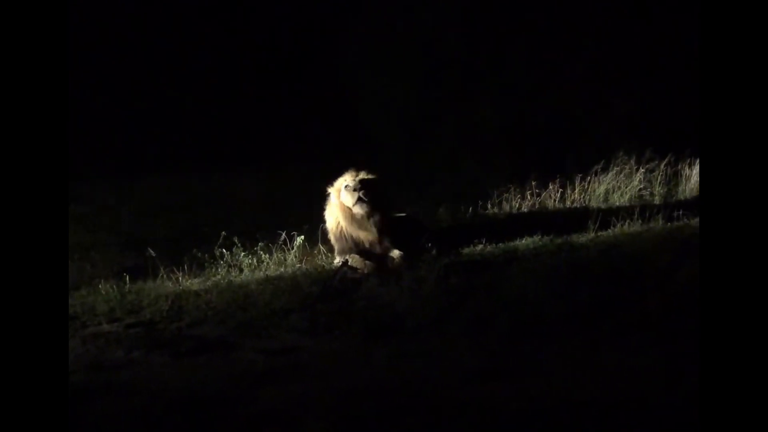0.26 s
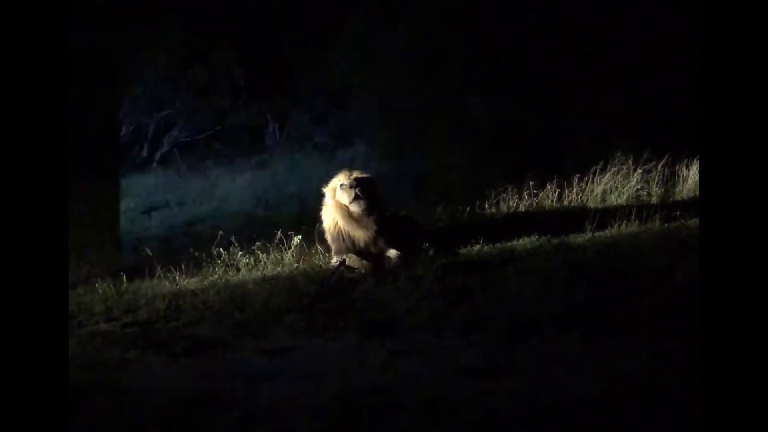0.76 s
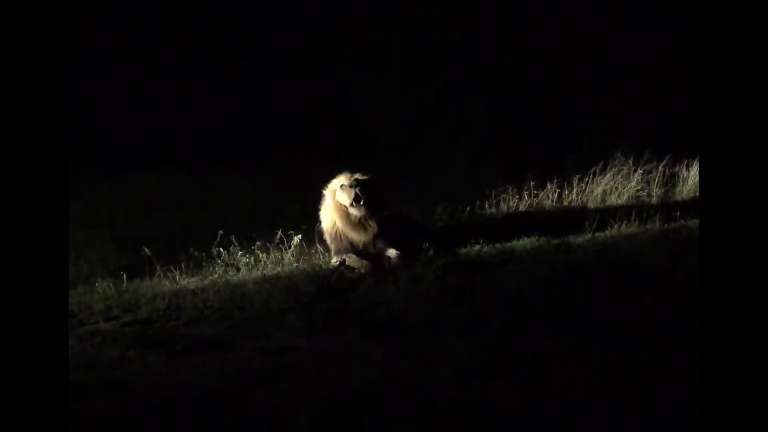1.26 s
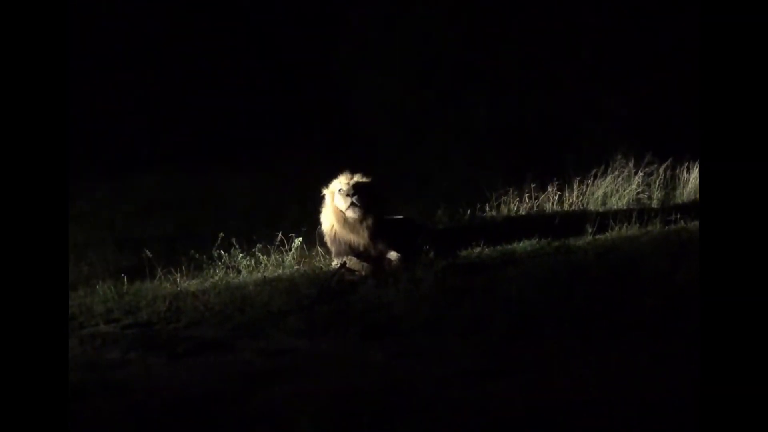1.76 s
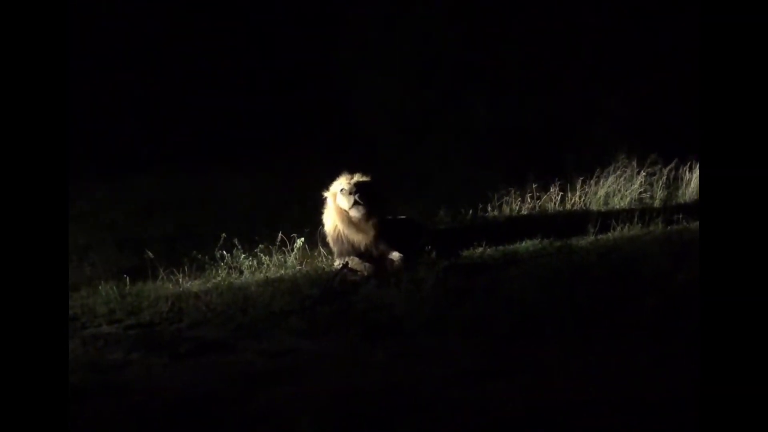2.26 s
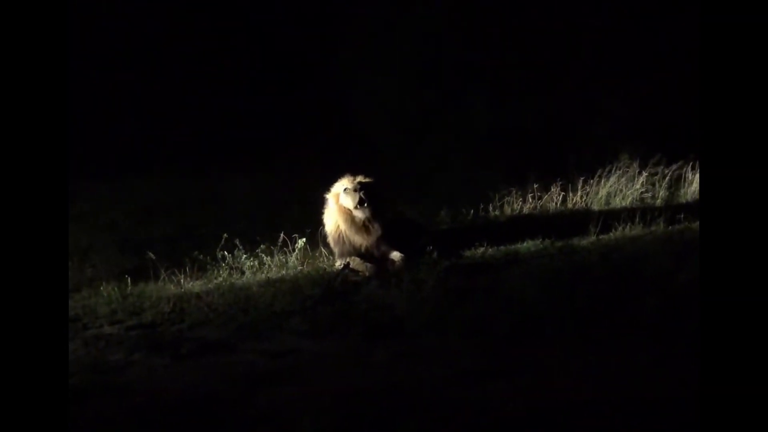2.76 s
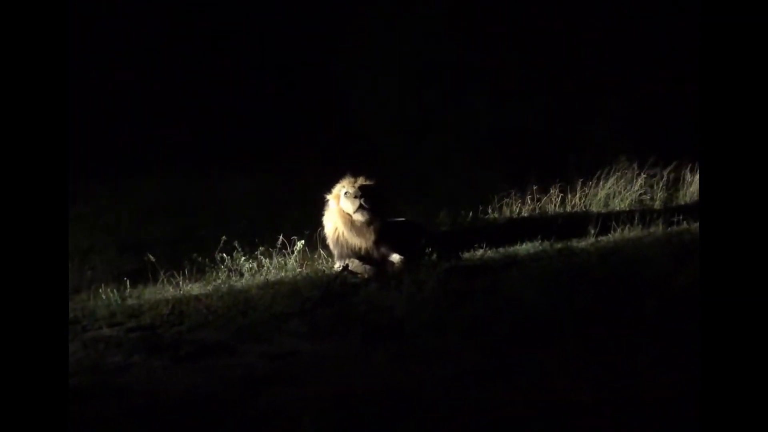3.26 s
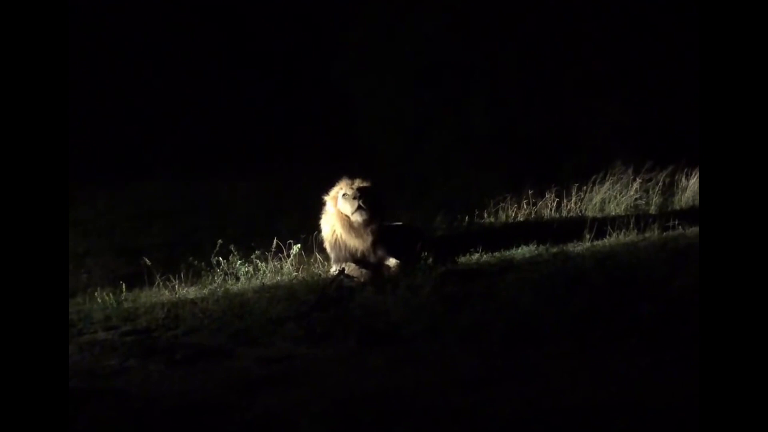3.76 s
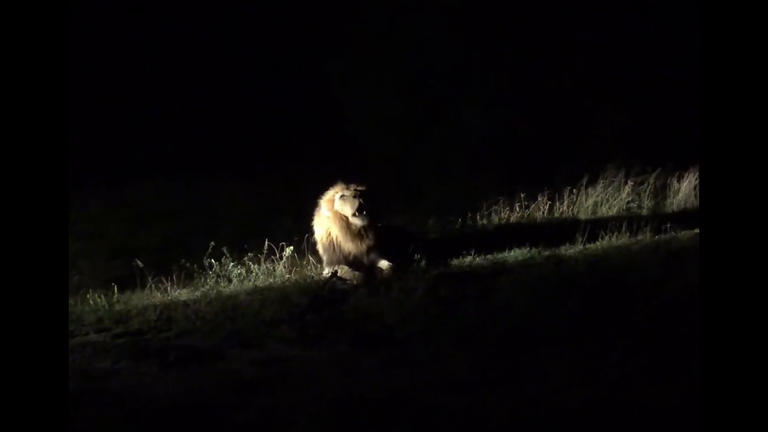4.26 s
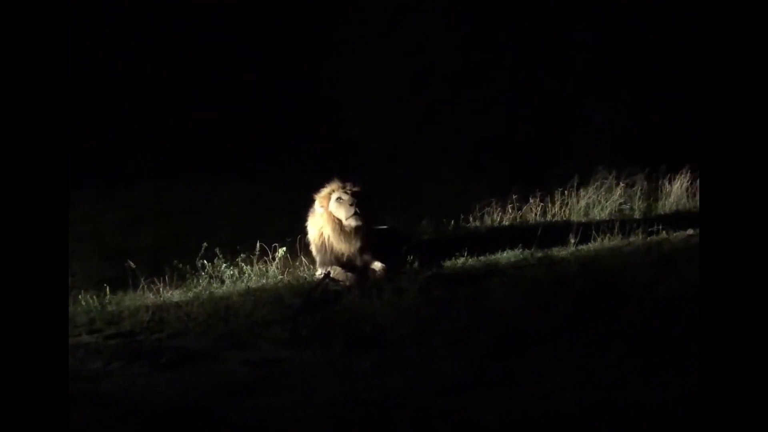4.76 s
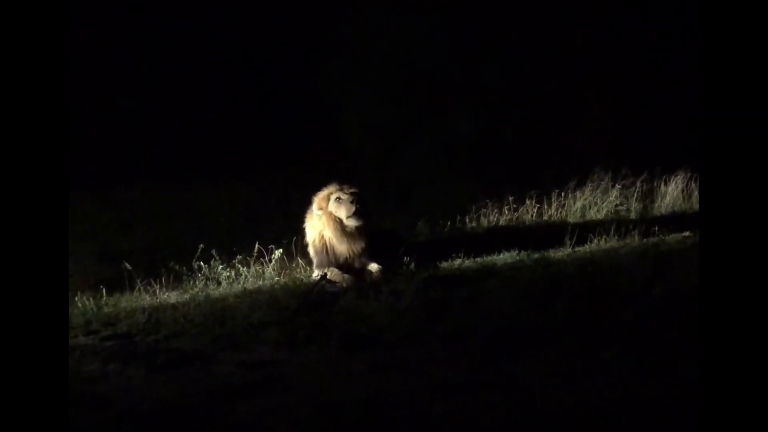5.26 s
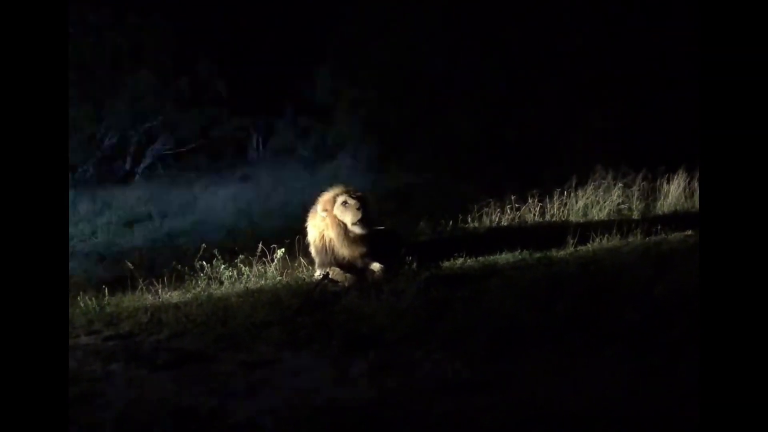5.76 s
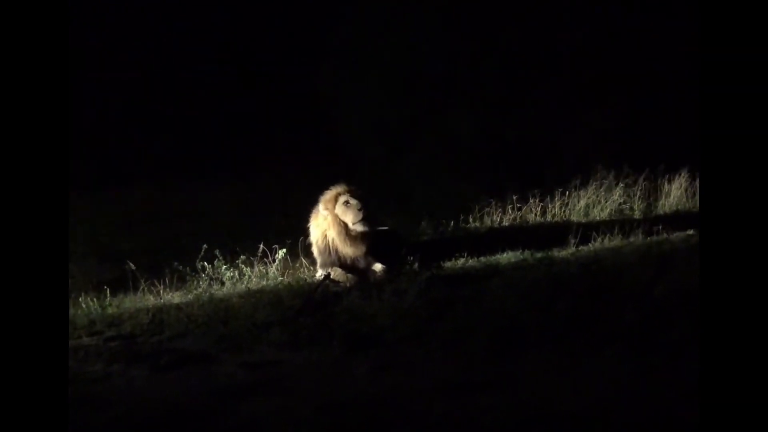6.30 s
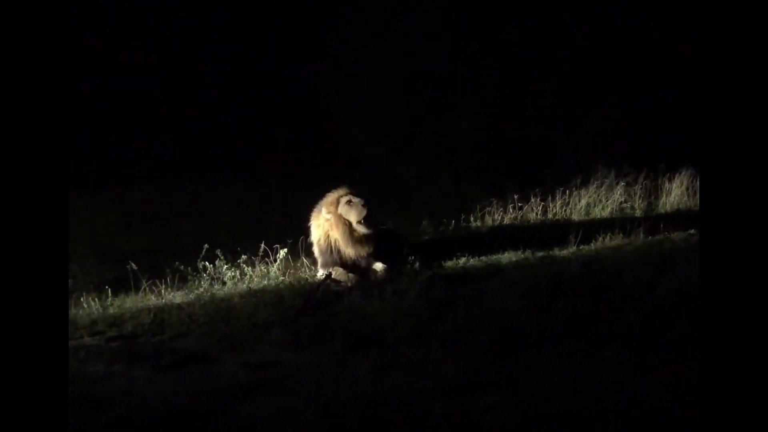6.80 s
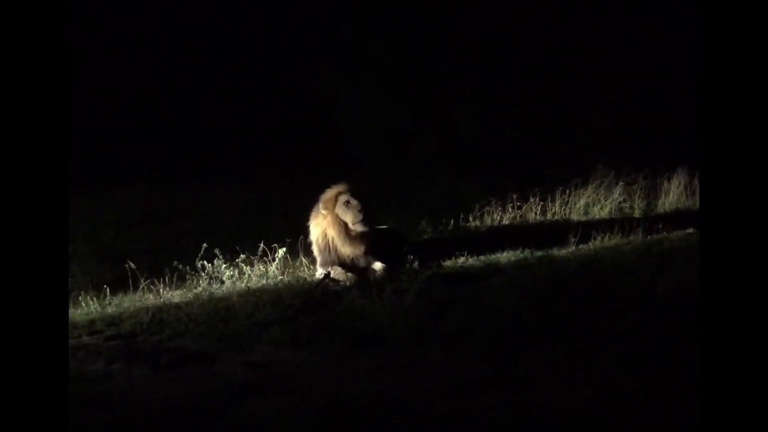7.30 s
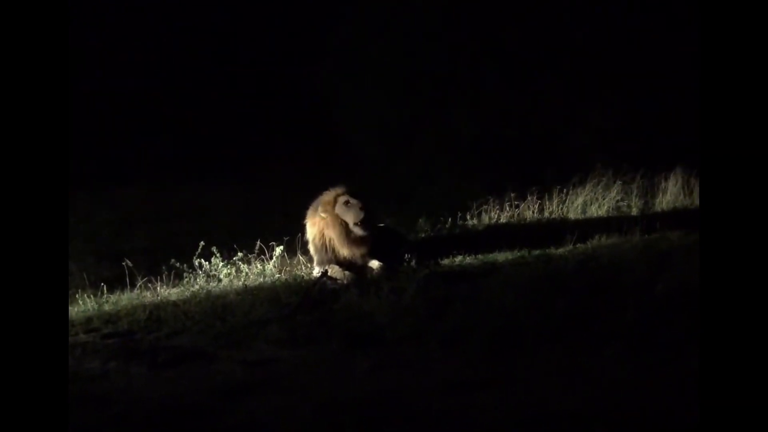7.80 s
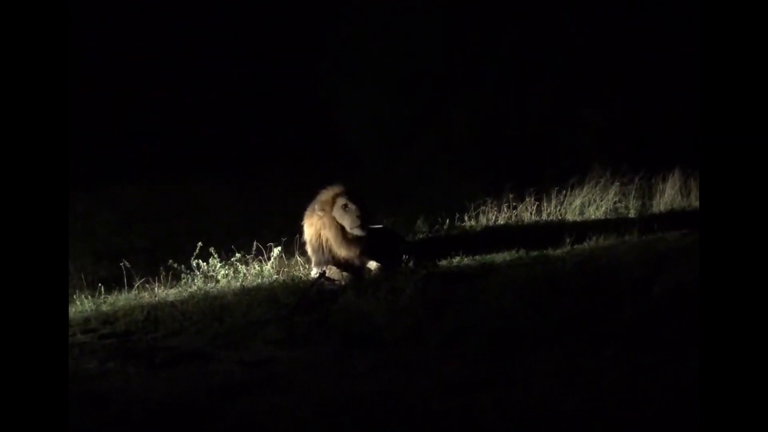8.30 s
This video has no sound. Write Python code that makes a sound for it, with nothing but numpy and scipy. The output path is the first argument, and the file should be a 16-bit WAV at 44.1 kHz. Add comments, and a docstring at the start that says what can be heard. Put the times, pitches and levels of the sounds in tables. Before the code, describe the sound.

A male lion on a grassy bank at night gives six deep, shortening roars with hoarse grunts and faint panting between, wind brushing the microphone.

```python
"""A male lion roars on a grassy bank at night, some way off, over a breeze and the quiet night air.
A grunt is already under way; then come six roars, most shorter than the last: a deep, nearly pure chest tone
with a rasping throat above it, sinking in pitch and growing rougher as the jaw opens.
Hoarse grunts, panting and faint moans fall between roars; gusts brush the microphone, most of them from 2 to 5 s.
Folds drive a sine, ringing throat pulses and puffs of noise; decaying noise makes the grass and land echoes."""
import sys
import numpy as np
from scipy import signal
from scipy.fft import rfft, irfft, next_fast_len
from scipy.io import wavfile
from scipy.ndimage import uniform_filter1d, minimum_filter1d

SR = 44100
rng = np.random.default_rng(int(sys.argv[2]) if len(sys.argv) > 2 else 0)


def transcribe(u):
    """Save the signal u as a 16-bit wav file named by the first command-line argument.

    u: samples, shape (n,) or (channels, n), limited to [-1, 1]; the rate is SR.
    q: integer samples, one column per channel.
    """
    v = np.clip(np.atleast_2d(u).T, -1, 1)
    q = np.round(v * 32767).astype(np.int16)
    wavfile.write(sys.argv[1], SR, q)


N = 376613
TIME = np.arange(N) / SR
ATTACK_S = 0.003

# throat resonances, jaw wide open: centre_hz, width_hz (per pass), relative_level_db
OPEN_THROAT_MODES = [(232, 53, -32), (334.1, 84, 8), (421, 52, 1), (732, 88, -3), (810, 69, -15),
                     (1016, 102, -6), (1250, 85, -13)]
# rasp spectrum, jaw wide open: frequency_hz, relative_density_db (per Hz)
OPEN_RASP_SPECTRUM = [(970, 1), (1650, -0.5), (1990, -13), (2230, -0.5), (2740, -3.5), (3010, -1.5),
                      (3560, -10), (4210, -6), (4890, -14), (7050, -12.5), (8350, -18.5), (11600, -21.5),
                      (12700, -26.5), (15500, -19.5)]


def lion(shimmer_db=7.5, rattle_db=3.0, lowest_hz=62):
    """Chest tone, throat and rasp all follow the same vocal folds."""
    pitch_hz, rough, jaw, (chest_gain, throat_gain, rasp_gain) = bout()
    phase = fold_phase(pitch_hz, rough)

    # irregular cycles smear the fundamental
    growl = rms_one(cut(rng.standard_normal(N), [80, 190], "band", order=3))
    shimmer = from_db(shimmer_db * rough * drift(14.3))
    tone = np.sqrt(2) * np.sin(phase) * shimmer + 1.52 * rough ** 2 * growl

    chest = chest_gain * evened(tone, 0.13)
    throat = throat_gain * throat_voice(phase, rough, jaw)
    rasp = rasp_gain * mouth_rasp(phase, jaw)

    # a slack throat flaps in slow, uneven beats
    flapping = rms_one(cut(rng.standard_normal(N), [20, 45], "band"))
    rattle = from_db(rattle_db * rough ** 2 * flapping)
    voice = rattle * (chest + throat) + rasp
    return cut(voice + catches(), lowest_hz, "high", order=4)


def bout(heave_rough=0.31, jaw_slower=1.9, dip_s=0.008, waver_db=1.0, waver_hz=9):
    """Each call takes over from the last: pitch, roughness, jaw opening (0-1), gains of chest, throat and rasp."""
    # roars: start_s, length_s, chest_db, throat_db, rasp_db, swell_s, fade_db (before each layer's share),
    #   top_hz (before sag), rise_s, slump_at_s, slump_hz, early_rough, late_rough (0-1),
    #   early_jaw, late_jaw (0-1), linger_s (before each layer's share)
    roars = [ (0.36, 0.89, -2, -20, -33, 0.082, 1.5, 162.5, .13, 0.95, 18.7, 0.23, 0.66, 0.032, 0.24, 0.066),
             (2.315, 0.62, -5, -19.5, -34.5, .042, 7.3, 151.2, 0.074, 0.58, 7, 0.22, 0.99, 0.052, 0.3, 0.06),
             (3.865, 0.44, -4, -19, -33.5, 0.037, 7.7, 146.2, .045, .35, 19, 0.21, .55, 0.035, 0.84, 0.072),
             (5.23, .38, -4.5, -18.5, -33.5, 0.029, 17.3, 144.5, 0.034, .3, 20.7, 0.16, 0.72, 0.15, 0.42, .05),
             (6.441, .46, -5, -18.5, -33.5, 0.038, 8.7, 143.8, .05, .31, 26, 0.23, 0.52, 0.11, 0.87, 0.049),
             (7.577, 0.25, -4.5, -18, -32, 0.048, 5.8, 142.8, .045, 0.25, 17.4, 0.28, 0.64, 0.34, 0.66, 0.039),
             ]
    # grunts: start_s, chest_db, throat_db, rasp_db, hold_s
    grunts = [(-.2, -13, -10, -29.5, 0.0039), (1.894, -15, -16, -34.5, 0.0035),
              (3.311, -15.5, -15.5, -32.5, 0.0059), (4.991, -15.5, -18.5, -36.5, 0.0064),
              (5.775, -15.5, -19, -37, 0.026)]
    # heaves, the jaw drops in mid-roar and the lion pushes: peak_s, rise_s, fall_s, throat_gain_db, rasp_gain_db
    heaves = [(0.473, 0.032, 0.025, 12, 5), (1.178, 0.0097, 0.13, 9, 5.5), (2.64, .02, 0.038, 10.5, 3.5),
              (4.259, 0.042, 0.014, 6.5, 6), (5.594, 0.011, 0.029, 11.5, -3),
              (6.851, 0.013, 0.021, 6.5, 12.5)]
    # brief dips in the chest tone, probably where voice and echo cancel: centre_s, gain_db
    dips = [(0.516, -6), (0.664, -8.5), (1.165, -14), (2.883, -6), (6.61, -14)]

    controls, gate = np.zeros((6, N)), np.ones(N)
    calls = [(row, roar) for row in roars] + [(row, grunt) for row in grunts]
    for (start_s, *row), call in sorted(calls, key=lambda c: c[0][0]):
        after = TIME >= start_s
        t = TIME[after] - start_s
        controls[:, after] = call(t, *row)
        gate[after] = np.minimum(t / ATTACK_S, 1)
        gate[~after] *= np.minimum((start_s - TIME[~after]) / ATTACK_S, 1)
    pitch_hz, rough, jaw, chest_db, throat_db, rasp_db = controls

    for peak_s, rise_s, fall_s, throat_gain_db, rasp_gain_db in heaves:
        push = bump(peak_s, rise_s, fall_s)
        throat_db = throat_db + throat_gain_db * push
        rasp_db = rasp_db + rasp_gain_db * push
        rough = rough + heave_rough * push
        # the jaw closes more slowly than the push fades
        jaw = jaw + (1 - jaw) * bump(peak_s, rise_s, jaw_slower * fall_s)

    # the push of air wavers in throat and rasp
    waver = waver_db * drift(waver_hz)
    throat_db, rasp_db = throat_db + waver, rasp_db + waver
    chest_db = chest_db + sum(db * bump(s, dip_s) for s, db in dips)
    gains = gate * from_db([chest_db, throat_db, rasp_db])
    return pitch_hz, np.clip(rough, 0, 1), np.clip(jaw, 0, 1), gains


def roar(t, length_s, chest_db, throat_db, rasp_db, swell_s, fade_db, top_hz, rise_s, slump_at_s, slump_hz,
         early_rough, late_rough, early_jaw, late_jaw, linger_s):
    """Swells, holds, tires; pitch climbs and sags, then slumps as air runs out: the voice frays, the jaw opens."""
    # rows chest, throat, rasp: lower_start_db, fade_share, linger_share, release_db_per_s
    roar_shape = [(25.1, 0.83, 0, 149), (8.6, 0.76, 0.39, 141.5), (13.8, 0.42, 0.83, 173)]
    start_hz, sag_hz_per_s, slump_s = 123.84, 27, 0.03075
    onset_rough, settle_s = 0.64, 0.04  # starts hoarse, then clears
    fade_power = 2.38  # tires late in the roar

    spent = np.minimum(t / length_s, 1) ** fade_power
    slump = 0.5 + 0.5 * np.tanh((t - slump_at_s) / (2 * slump_s))
    pitch_hz = top_hz + (start_hz - top_hz) * np.exp(-t / rise_s) - sag_hz_per_s * t - slump_hz * slump
    rough = early_rough + onset_rough * np.exp(-t / settle_s) + (late_rough - early_rough) * slump
    jaw = early_jaw + (late_jaw - early_jaw) * slump

    levels_db = []
    for db, shape in zip((chest_db, throat_db, rasp_db), roar_shape):
        lower_db, fade_share, linger_share, release_db_per_s = shape
        overtime_s = np.maximum(t - length_s - linger_share * linger_s, 0)
        onset_db = -lower_db * np.exp(-t / swell_s)
        levels_db.append(db + onset_db - fade_share * fade_db * spent - release_db_per_s * overtime_s)
    return [pitch_hz, rough, jaw, *levels_db]


def grunt(t, chest_db, throat_db, rasp_db, hold_s):
    """Opens softly, bursts from an open mouth, then falls in pitch and dies away."""
    # rows chest, throat, rasp: lower_start_db, swell_s, decay_db_per_s
    grunt_shape = [(21, 0.081, 116), (7.42, 0.059, 190), (13.94, 0.088, 130)]
    start_hz, end_hz, fall_s = 142.78, 80.84, 0.12
    onset_rough, late_rough, clears_s, jaw = 0.46, 0.38, 0.097, 0.976
    lead_s, soft_db = 0.023, -3.5  # a short, softer start before the full grunt

    pitch_hz = end_hz + (start_hz - end_hz) * np.exp(-t / fall_s)
    rough = late_rough + onset_rough * np.exp(-(t / clears_s) ** 2)
    lead_db = np.interp(t, [lead_s - ATTACK_S, lead_s], [soft_db, 0])

    levels_db = []
    for db, (lower_db, swell_s, decay_db_per_s) in zip((chest_db, throat_db, rasp_db), grunt_shape):
        onset_db = -lower_db * np.maximum(1 - t / swell_s, 0) ** 2
        decay_db = decay_db_per_s * np.maximum(t - swell_s - hold_s, 0)
        levels_db.append(db + lead_db + onset_db - decay_db)
    return [pitch_hz, rough, np.full(len(t), jaw), *levels_db]


def fold_phase(pitch_hz, rough, jitter=0.01113, rough_jitter=0.03596):
    """Heavy, slack folds keep time less well the rougher the voice."""
    spread = jitter + rough_jitter * rough ** 2
    return 2 * np.pi * np.cumsum(pitch_hz * (1 + spread * drift(82.9))) / SR


def throat_voice(phase, rough, jaw, doubling=0.6, low_cut_hz=190):
    """Fold pulses and turbulence ring the throat, whose resonances change as the jaw opens."""
    # resonances, jaw nearly shut: centre_hz, width_hz (per pass), relative_level_db
    shut_modes = [(278.9, 58, 5), (375.6, 114, 10), (465, 138, 2), (633, 129, 5.5), (785, 70, -42.5),
                  (1046, 120, -10.5), (1190, 60, -4)]
    # narrow bands missing from the throat sound, perhaps by reflection from the ground: centre_hz, width_hz
    notches = [(595, 60), (925, 90)]

    # k*k/2 smears each closure in time
    pulses = rms_one(sum(np.cos(k * phase + k * k / 2) for k in range(2, 15)))
    # spells of strong and weak pulses
    pulses = pulses * (1 + doubling * drift(4.2) * np.cos(phase / 2) + 0.5 * rough * drift(54))
    turbulence = 3.2 * puffs(phase, depth=0.8, flutter_db=3)
    source = np.sqrt(1 - rough) * pulses + np.sqrt(rough) * turbulence
    source = cut(source, low_cut_hz, "high", order=4)
    source = flaring(source, depth_db=3.2, width_hz=70, hold_s=0.08, size=2048)

    shut = resonate(source, shut_modes)
    wide = resonate(source, OPEN_THROAT_MODES)
    voice = np.sqrt(1 - jaw) * shut + np.sqrt(jaw) * wide
    for hz, width_hz in notches:
        voice = signal.lfilter(*signal.iirnotch(hz, hz / width_hz, fs=SR), voice)
    return evened(voice, 0.044)


def mouth_rasp(phase, jaw, low_cut_hz=1550):
    """Air tears past the tongue and teeth in step with the folds."""
    # jaw nearly shut: frequency_hz, relative_density_db (per Hz)
    shut_spectrum = [(970, -15.5), (1650, -4), (1900, -7), (2090, -10), (2710, -3), (3180, -9.5),
                     (3870, -21), (4710, -10.5), (6480, -21), (8270, -19.5), (9700, -27), (12100, -24.5),
                     (15500, -29.5)]
    shut = coloured(puffs(phase, depth=0.18, flutter_db=1.2), shut_spectrum)
    wide = coloured(puffs(phase, depth=0.22, flutter_db=1.8), OPEN_RASP_SPECTRUM)
    rasp = cut(np.sqrt(1 - jaw) * shut + np.sqrt(jaw) * wide, low_cut_hz, "high", order=6)
    return evened(flaring(rasp, depth_db=4.0, width_hz=220, hold_s=0.07), 0.06)


def puffs(phase, depth, flutter_db):
    """Turbulence let through once a cycle, in puffs of uneven strength."""
    opening = np.exp(depth * np.cos(phase))
    return rms_one(rng.standard_normal(N) * opening * from_db(flutter_db * drift(45)))


def flaring(x, depth_db, width_hz, hold_s, size=1024):
    """Random patches of time and frequency grow stronger and weaker, giving an uneven, shifting grain."""
    hop = size // 4
    spectra = signal.stft(x, nperseg=size, noverlap=size - hop)[2]
    patches = rng.standard_normal(spectra.shape)
    # smoothed twice along frequency and time
    for axis, span in enumerate([width_hz * size / SR, hold_s * SR / hop] * 2):
        patches = uniform_filter1d(patches, max(round(span), 1), axis=axis % 2, mode="wrap")
    gain = from_db(depth_db * np.clip(rms_one(patches), -2, 2))
    return signal.istft(spectra * gain, nperseg=size, noverlap=size - hop)[1][:N]


def catches(decay_s=0.0064, smack_db=-11, ring_db=-8):
    """The throat catches: brief bursts of air smack wetly in the mouth and ring the open throat."""
    # start_s, peak_db (before smack and ring gains)
    catch_rows = [(0.4695, -14.5), (1.894, -29), (1.919, -25.5), (1.9625, -14), (2.6325, -12.5),
                  (3.33, -22), (4.2782, -10), (5.016, -36.5), (5.5906, -13), (5.6251, -17), (5.7935, -41),
                  (6.4433, -32), (6.8454, -15)]
    bursts = np.zeros(N)
    for s, db in catch_rows:
        bursts += from_db(db) * (TIME >= s) * np.exp(-np.abs(TIME - s) / decay_s)
    burst_air = bursts * rng.standard_normal(N)
    smack = from_db(smack_db) * coloured(burst_air, OPEN_RASP_SPECTRUM)
    ring = from_db(ring_db) * resonate(burst_air, OPEN_THROAT_MODES)
    return np.std(burst_air) * (smack + ring)


def pauses(split_hz=1450):
    """Between calls the lion draws air, as throat and hiss noise, and moans faintly, as a wavering sine."""
    # pants: centre_s, half_length_s, throat_db, hiss_db
    pants = [(0.25, 0.26, -50, -57.5), (1.805, 0.069, -49.5, -59), (2.203, 0.063, -43.5, -49),
             (3.224, 0.043, -55, -59.5), (3.31, 0.02, -54, -57), (3.747, 0.051, -43, -50.5),
             (4.895, .11, -47.5, -62.5), (6.36, 0.053, -47, -58), (7.492, 0.15, -55, -63.5)]
    # frequency_hz, relative_density_db
    pant_spectrum = [(120, -4.5), (200, -19.5), (329, -14), (390, -2), (496, -28.5), (711, -15),
                     (829, -22.5), (888, -28), (3210, -25.5), (4010, -32), (12000, -49.5), (15600, -86),
                     (22000, -120)]
    # moans: start_s, length_s, pitch_hz, level_db (before swell and waver)
    moans = [(4.773, 0.208, 145, -38), (8.103, 0.167, 136, -56)]

    airflow = coloured(rng.standard_normal(N), pant_spectrum)
    throat = rms_one(cut(airflow, split_hz, "low", order=4))
    hiss = rms_one(cut(airflow, split_hz, "high", order=4))
    pant = np.zeros(N)
    for s, half_s, throat_db, hiss_db in pants:
        pant += bump(s, half_s) * (from_db(throat_db) * throat + from_db(hiss_db) * hiss)

    phase_per_hz = fold_phase(1, 0.7785)
    moan = np.zeros(N)
    for start_s, length_s, hz, db in moans:
        moan += from_db(db) * swell(start_s, length_s) * np.sin(hz * phase_per_hz)
    return pant + np.sqrt(2) * moan * from_db(2.0 * drift(3.4))


def swell(start_s, length_s, swell_db=2, edge_s=0.035):
    """Gain of a soft sound that fades in, grows by swell_db and stops."""
    t = TIME - start_s
    gate = np.clip(np.minimum(t, length_s - t) / edge_s + 0.5, 0, 1)
    return gate * from_db(swell_db * (np.clip(t / length_s, 0, 1) + 2))


def land_echo(x, t60_s=0.84, delay_s=0.011, dull_hz=400, echo_db=-18):
    """Banks and trees scatter a dull tail: decaying, low-passed noise."""
    t = TIME[:SR]
    tail = cut(rng.standard_normal(SR), dull_hz, "low") * from_db(-60 * t / t60_s) * (t > delay_s)
    tail *= np.sqrt(2 * dull_hz / SR / np.sum(tail ** 2))  # about unit gain below dull_hz
    return from_db(echo_db) * signal.fftconvolve(x, tail)[:N]


def air(breeze_db=-44.5, drop_db_per_s=4.5, night_db=-62.5):
    """Lumpy wind noise at the microphone, dying down between gusts, over still night air."""
    # gusts: centre_s, half_length_s, level_db
    gusts = [(2.244, 0.21, -30.5), (2.85, 0.1, -17.5), (3.03, 0.035, -16), (3.195, 0.033, -23.5),
             (3.279, 0.043, -21.5), (3.432, .11, -27), (3.693, 0.052, -29.5), (3.821, 0.036, -22.5),
             (4.184, .19, -23), (4.898, 0.19, -36), (7.884, 0.088, -27.5)]
    # frequency_hz, relative_density_db
    breeze_spectrum = [(15, -61), (25, -26), (54, -6), (124, 4.5), (242, -11), (484, -29.5), (523, -20),
                       (659, -28), (1000, -30), (1300, -88), (2200, -120)]
    # frequency_hz, relative_density_db (per Hz)
    night_spectrum = [(18, -46.5), (30, -52.5), (140, 7.5), (237, -18), (369, -15), (518, -24), (1640, -25),
                      (2020, -30), (2490, -27), (4090, -32), (15500, -42.5)]

    wind = from_db(breeze_db - drop_db_per_s * TIME)
    wind = wind + sum(from_db(db) * bump(s, half_s) for s, half_s, db in gusts)
    breeze = wind * evened(coloured(rng.standard_normal(N), breeze_spectrum), 0.29)
    night = coloured(rng.standard_normal(N), night_spectrum)
    # night_db is the rms above 250 Hz
    return breeze + from_db(night_db) * night / np.std(cut(night, 250, "high", order=4))


def from_db(db):
    """Decibels to gain."""
    return 10 ** (np.asarray(db) / 20)


def rms_one(x):
    """Scale to unit power."""
    return x / np.sqrt(np.mean(x ** 2) + 1e-20)


def drift(rate_hz):
    """Smooth random wandering of spread 1: two-pole noise at SR / 20, interpolated."""
    r = np.exp(-40 * np.pi * rate_hz / SR)
    noise = rng.standard_normal(N // 20 + 2002)
    slow = signal.lfilter([1], [1, -2 * r, r * r], noise)[2000:]  # skips the settling
    return np.interp(np.arange(N) / 20, np.arange(len(slow)), rms_one(slow))


def evened(x, window_s):
    """Hold the short-time power at 1."""
    size = max(int(window_s * SR / 2), 2)
    power = uniform_filter1d(uniform_filter1d(x * x, size), size)
    return x / np.sqrt(np.abs(power) + 1e-12)


def cut(x, hz, kind, order=2):
    """Butterworth filter."""
    return signal.sosfilt(signal.butter(order, hz, kind, fs=SR, output="sos"), x)


def coloured(x, spectrum):
    """Give a white signal a spectrum; rms 1."""
    hz, db = np.transpose(spectrum)
    size = next_fast_len(N)
    bins_hz = np.maximum(np.arange(size // 2 + 1) * SR / size, 1)
    gain = from_db(np.interp(np.log(bins_hz), np.log(hz), db, left=-120))
    return rms_one(irfft(rfft(x, size) * gain, size)[:N])


def resonate(x, modes):
    """Parallel resonances, each passed twice for deep valleys between them; rms 1."""
    out = np.zeros(N)
    for hz, width_hz, db in modes:
        r = np.exp(-np.pi * width_hz / SR)
        section = [(1 - r * r) / 2, 0, (r * r - 1) / 2, 1, -2 * r * np.cos(2 * np.pi * hz / SR), r * r]
        out += from_db(db) * signal.sosfilt([section, section], x)
    return rms_one(out)


def bump(peak_s, rise_s, fall_s=None):
    """Gaussian rise and fall of height 1; symmetric unless the fall is given."""
    width_s = np.where(TIME < peak_s, rise_s, fall_s or rise_s)
    return np.exp(-np.minimum(((TIME - peak_s) / width_s) ** 2, 50))


def scene():
    """The lion, the scatter of the grass close by, the echo of the land and the night."""
    voice = lion()
    grass = land_echo(cut(voice, 210, "high"), t60_s=0.26, delay_s=0.016, dull_hz=6880, echo_db=-8.5)
    return (voice + grass + land_echo(voice) + pauses() + air())[None]


def record(dry, ceiling=0.97, window_s=0.02, cutoff_hz=15750):
    """A limiter holds down the loudest cycles; a steep low-pass cuts the top."""
    size = int(window_s * SR)
    room_left = np.minimum(1, ceiling / (np.abs(dry) + 1e-9))
    gain = uniform_filter1d(minimum_filter1d(room_left, size), size)
    low_pass = signal.ellip(12, 0.1, 90, cutoff_hz, fs=SR, output="sos")
    return signal.sosfilt(low_pass, dry * gain)


dry = scene()
out = record(dry)
transcribe(out)
```